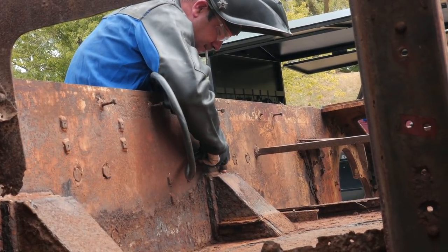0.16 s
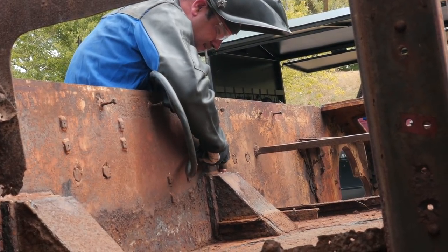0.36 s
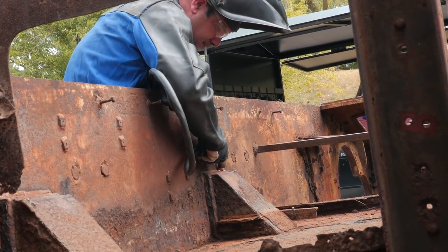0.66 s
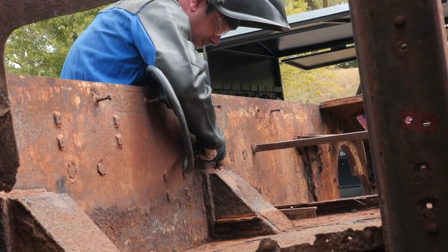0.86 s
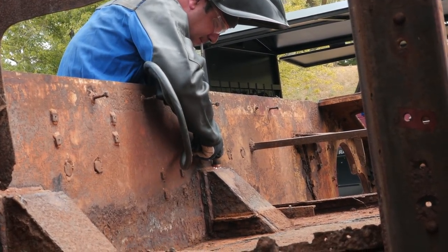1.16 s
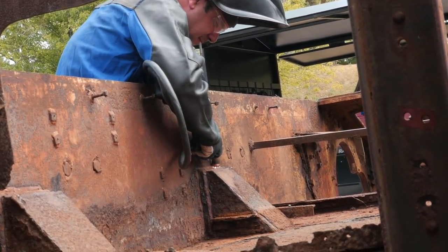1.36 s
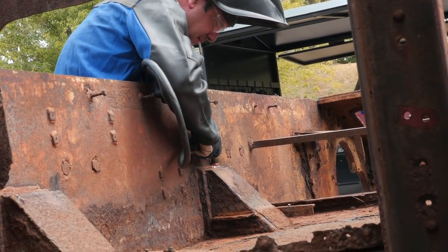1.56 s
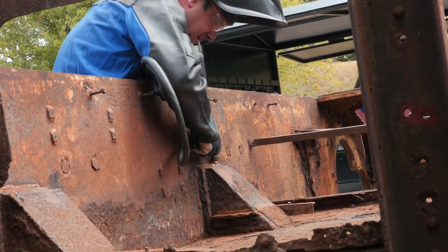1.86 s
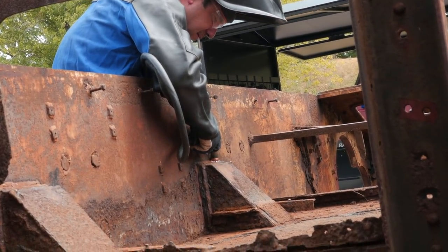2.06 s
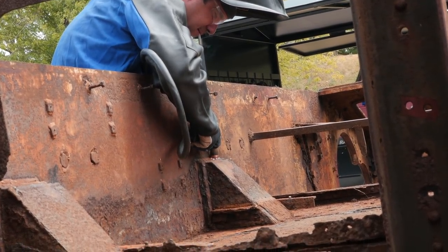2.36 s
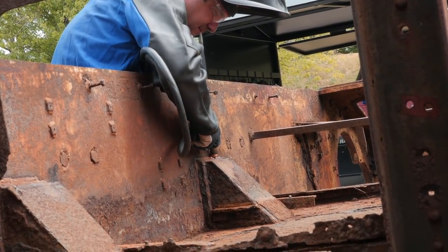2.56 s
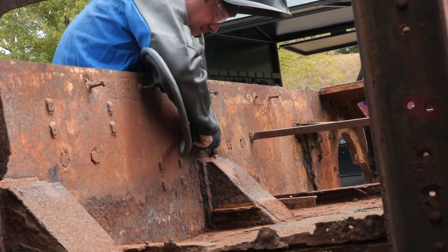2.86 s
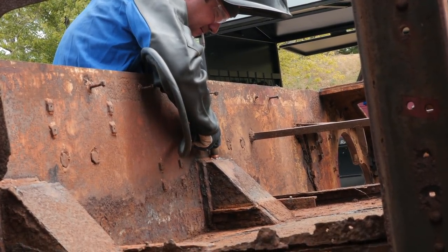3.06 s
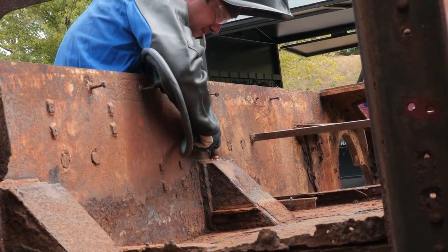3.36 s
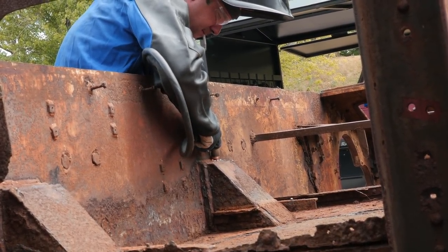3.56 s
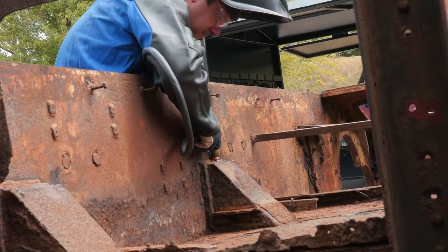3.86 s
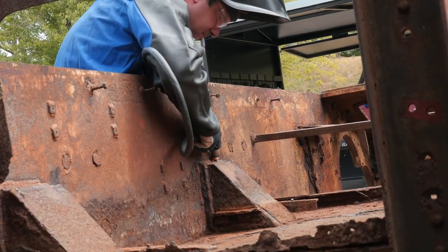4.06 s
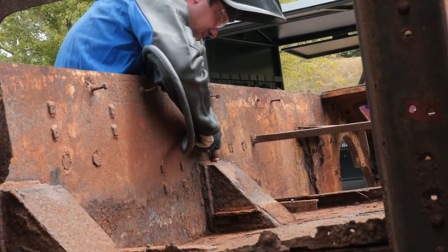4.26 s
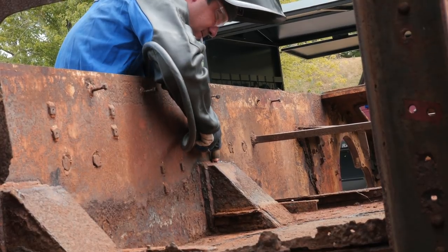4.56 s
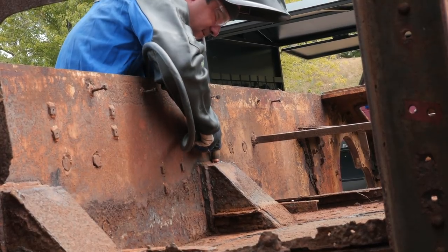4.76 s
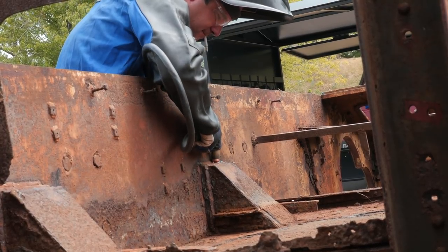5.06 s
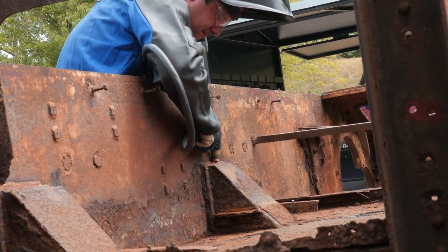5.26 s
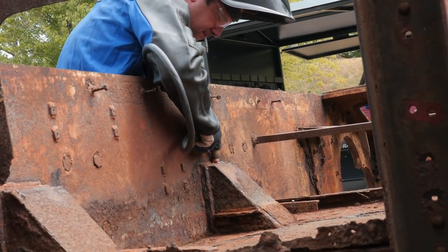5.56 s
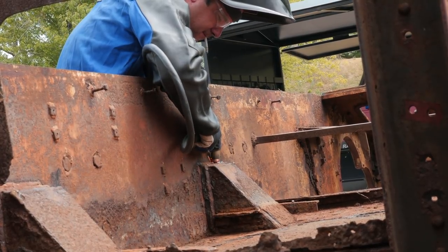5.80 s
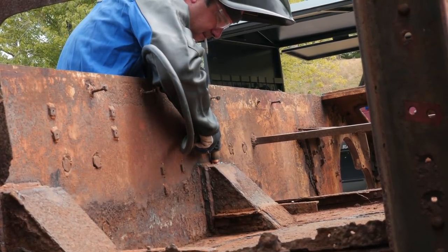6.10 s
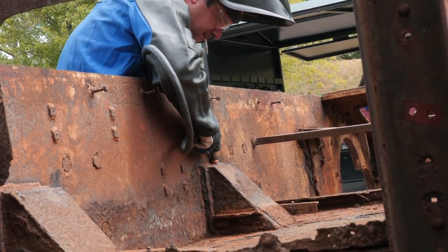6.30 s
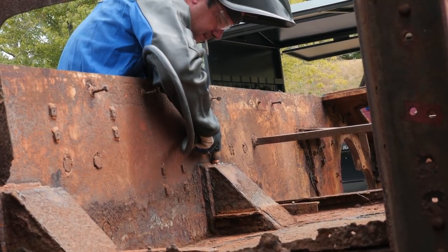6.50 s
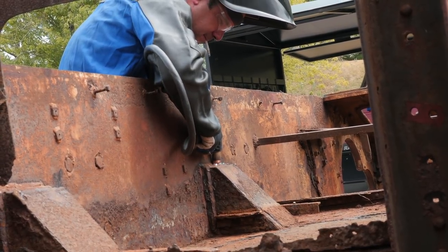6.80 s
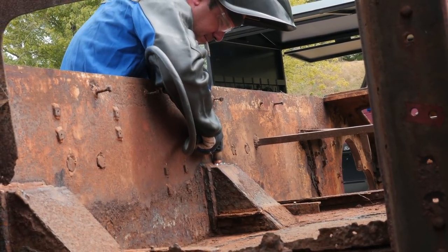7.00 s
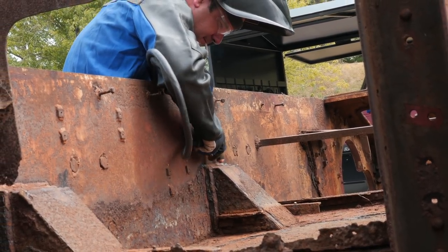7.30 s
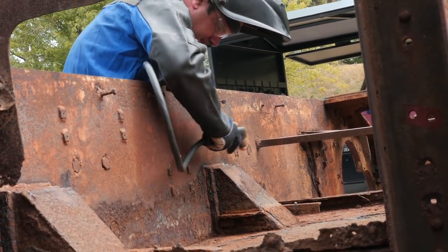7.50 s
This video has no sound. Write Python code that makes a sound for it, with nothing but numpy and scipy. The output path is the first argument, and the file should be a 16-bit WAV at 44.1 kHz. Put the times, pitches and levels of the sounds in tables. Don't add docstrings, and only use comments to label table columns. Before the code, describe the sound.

A plasma torch cuts rusty steel, heard close in stereo, with machines further behind. At 0 seconds air is already hissing softly over a low, buzzing generator hum near 92 hertz and a steady mid-low blower whine near 400 hertz. Around 0.15 the arc strikes and the hiss jumps to a loud, bright, harsh roar. From 0.2 to 0.5 short breathy whistles ring as the metal is pierced, while the engine slows slightly and grows quieter. From 0.5 to 7.2 the jet sizzles continuously, fluttering and faltering briefly, slowly brightening, with metallic resonances and very short echoes from the surrounding plates. The hum and whine waver gently beneath. At about 7.25 the arc goes out suddenly; the hiss falls to a softer rush of air, and the engine picks up speed again until the sound ends at about 7.6.

```python
import sys
import numpy as np
from scipy import signal
from scipy.io import wavfile

SR = 44100
rng = np.random.default_rng(int(sys.argv[2]) if len(sys.argv) > 2 else 0)


def store_wav(level_fs):
    pcm = np.round(np.clip(np.atleast_2d(level_fs), -1, 1) * 32767)
    wavfile.write(sys.argv[1], SR, pcm.T.astype(np.int16))


def magnitude_from_level(level_db):
    exponent = np.asarray(level_db, float) / 20
    return 10 ** exponent


N = 336924

# (time [s], firing rate [Hz], firing tone level [dB])
SPEED = [(0, 92.9, -27.4), (.14, 92.9, -27.2), (.3, 91.9, -29.8), (.45, 91.4, -30.1), (.7, 91.2, -30.4),
         (2, 91.25, -31.1), (3.5, 91.3, -31.1), (4.3, 91.45, -31.1), (5, 91.3, -31.8), (7.22, 91.3, -31.8),
         (7.35, 92.1, -30.8), (7.5, 93.1, -29.9), (7.64, 93.1, -30.1)]
# (time [s], length [s], exhaust change [dB], blower change [dB])
GUSTS = [(.12, 0.16, 4.5, .6), (.31, 0.066, 4.5, 4.5), (.56, 0.09, 3.5, -2.2), (.74, .06, 2, 3),
         (.84, 0.069, .3, -6), (1.4, 0.1, -2, -6), (1.58, 0.11, 2, 3), (1.72, 0.099, -4, -3.2),
         (1.85, 0.087, 5, 3), (2.37, 0.059, -1, 3), (2.87, 0.28, 4, 2), (3.35, .15, -6, 1.5),
         (3.6, 0.23, 2.5, -.6), (3.86, .07, 3, -3), (4.28, 0.072, 0, 2.2), (4.4, .07, -.3, -2.5),
         (4.68, 0.12, 0, 3), (4.88, 0.086, -3, -4), (5, 0.055, .3, 3.5), (5.1, .07, .3, -2.5),
         (5.46, 0.19, 1.5, -4), (5.58, .06, .3, 4), (5.76, .12, -2.2, -1.8), (6.44, .07, 1, -2.5),
         (6.8, .15, 3.5, -1.5), (7.03, 0.15, 6, -2.2), (7.14, 0.07, -9, 1.5), (7.4, 0.091, 1.5, .6)]


def jet(offset_db, flutter_db, patchy_db):
    # (frequency [Hz], level [dB per Hz])
    jet_colour = [(760, -42), (1300, -14.5), (1540, -12), (2330, -4.5), (2560, -8), (3530, -7.5),
                  (3790, -8.5), (4210, -7), (5020, -10.5), (5870, -7), (7940, -4), (9980, -1.5),
                  (12900, 2.5), (14400, -5.5), (15600, -5.5)]
    layer_hz = [2500, 6000, 10800, 14200]
    # (frequency [Hz], width [Hz], level [dB])
    trough_rings = [(2286, 44, -27), (2727, 30, -6), (3590, 240, -15), (4400, 71, -9), (4620, 47, -1),
                    (5180, 470, -26), (5070, 180, -7), (5780, 340, 5), (6830, 130, -10), (7360, 50, -22),
                    (9830, 350, 19.5), (10400, 39, -17), (11000, 99, -13), (13400, 60, -12)]
    # (frequency [Hz], width [Hz], share lost [0 to 1])
    trough_dips = [(1540, 110, 0.27), (3750, 200, 0.53), (5116, 200, 0.69), (5625, 91, 0.61),
                   (9140, 130, 0.17)]
    # (time [s], lift [times])
    kerf_ring = [
        (0, 0.084),
        (2.5, 0.092),
        (4, 0.25),
        (5.5, 0.4),
        (6.8, 0),
        (7.15, 0.63),
        (7.64, 0.65),
    ]
    # (frequency [Hz], width [Hz], lift [times])
    shallow_rings = [(4200, 170, 0.34), (13000, 350, 0.54)]
    arc_db = -27.5
    rings_wander_db = 2.5
    shallow_s = 7.2

    swings = arc_swings()
    flutter = flutter_db * (drift(34.0) + 0.6 * drift(23.0))

    def band_db(hz):
        place = np.interp(np.log(hz), np.log(layer_hz), np.arange(4))
        shares = np.clip(1 - abs(place - np.arange(4)), 0, 1)
        steady_db = at_hz(jet_colour, hz) + arc_db
        return steady_db + shares @ swings + flutter + patchy_db * drift(10.5)

    hiss = banded_noise(np.geomspace(1250, 16500, 21), band_db)
    top_db = max(db for hz, width_hz, db in trough_rings)
    for hz, width_hz, ring_db in trough_rings:
        lift = 0.79 * magnitude_from_level(0.14 * (ring_db - top_db) + rings_wander_db * drift(1.2))
        hiss = hiss + lift * resonance(hiss, hz, 1.43 * width_hz)
    for hz, width_hz, share in trough_dips:
        hiss = hiss - share * resonance(hiss, hz, width_hz)
    hiss = hiss + at_times(kerf_ring)[0] * resonance(hiss, 11770, 780)
    for hz, width_hz, lift in shallow_rings:
        hiss = hiss + lift * bump(0, shallow_s) * resonance(hiss, hz, width_hz)
    return magnitude_from_level(offset_db) * trough_echoes(hiss, echo_db=-28.0, t60=.11, rust_hz=11300)


def arc_swings():
    valve_db = [-12.5, -14, -15, -19]
    preflow_db = [-4.5, -5.5, -2, -10]
    deepens_db_per_s = [0.17, 0.042, 0.25, 0.47]
    afterflow_db = [-7, -7.5, -6, -10.5]
    roar_share = [1.67, 0.55, 0.03, .3]
    hiss_share = [.05, .3, .9, 1.2]
    # (time [s], length [s], roar change [dB], hiss change [dB])
    falters = [(.22, 0.088, 1, -0.3), (0.356, 0.079, 0.7, -1), (0.497, 0.13, -1.5, -0.5),
               (0.922, 0.28, -0.3, 1.2), (1.102, .1, -0.7, -2.2), (1.38, .08, -1, -.6), (1.48, .08, 2.2, 0),
               (1.677, 0.44, -0.7, -0.3), (2.1, 0.56, 1, 0), (2.61, 0.09, -2.5, -1.5), (2.9, 0.47, 1, 0.3),
               (3.555, 0.13, 1.5, 0.5), (3.84, 0.086, -1.5, -2.5), (4.364, 0.069, -1, -1.5),
               (4.798, 0.28, -1.5, 0.7), (4.918, .12, 0.7, 1.2), (5.168, 0.11, 1.5, -1),
               (5.483, 0.12, -0.8, -1.8), (5.644, 0.078, 0.5, 0), (6.1, 0.17, 0.9, 0.7), (6.25, 0.09, 0, 0),
               (6.47, .2, 1.5, 1.5), (6.82, 0.069, -2.5, 0.2), (6.98, 0.14, -2, -0.2), (7.2, 0.083, 0, 0),
               (7.3, .04, 1, 1.5), (7.55, .1, -1.5, 2.5)]
    strike_s, strike_rise_s = .135, .05
    out_s, out_fall_s = 7.25, .032

    t = np.arange(N) / SR
    moments = [0, strike_s, strike_s + strike_rise_s, out_s, out_s + out_fall_s]
    roar_db, hiss_db = swells(falters)
    layers = []
    for k in range(4):
        flow_db = np.interp(t, moments, [valve_db[k], preflow_db[k], 0, 0, afterflow_db[k]])
        falter_db = roar_share[k] * roar_db + hiss_share[k] * hiss_db
        layers.append(flow_db + deepens_db_per_s[k] * t + falter_db)
    return np.array(layers)


def trough_echoes(x, echo_db, t60, rust_hz):
    age = np.arange(1, 3000) / SR
    travel = np.linspace(0, 3, N)
    out = x.copy()
    rust = signal.butter(2, rust_hz, fs=SR, output="sos")
    for place in range(4):
        dying = magnitude_from_level(echo_db - 60 * age / t60) * (age > .0004)
        bounces = signal.sosfilt(rust, rng.standard_normal((2, len(age))) * dying)
        nearness = np.cos(np.clip(travel - place, -1, 1) * np.pi / 2)
        out += signal.oaconvolve(x * nearness, bounces, axes=1)[:, :N]
    return out


def pierce():
    # (time [s], length [s], pitch [Hz], level [dB])
    pierce_rings = [
        (.197, .09, 1830, -39),
        (.195, .085, 2060, -41),
        (.2, .06, 1720, -47),
        (.25, .045, 2360, -44),
        (.285, .05, 1830, -44),
        (.352, .05, 2080, -40),
        (.4, .12, 2330, -47),
        (.42, .07, 1860, -48),
    ]
    rings = 0
    for s, length_s, hz, ring_db in pierce_rings:
        shape = bump(s, length_s / 2 + .005) ** .5
        whistle = magnitude_from_level(ring_db) * shape * tone(np.full(N, hz))
        rings = rings + whistle * np.array([1 + .3 * drift(90) for ear in (0, 1)])
    left, right = rings
    return np.array([np.roll(left, 5), right])


def generator():
    orders_heard = [3, 4, 5, 6, 7, 8, 9, 11, 12, 15, 18, 19, 24, 28, 29, 30]
    # (level over firing tone [dB], wobble [dB])
    order_tones = [(0, 0.15), (-37, -13), (-18, 1.5), (-7.5, 1), (-47, 9), (-21, 1), (-26.5, -8), (-17, 0),
                   (-15.5, 2), (-49, 2), (-21, 2.9), (-26, 1.5), (-32, -1.5), (-16, -0.2), (-45, -8),
                   (-26.5, 3)]
    # (frequency [Hz], level [dB per Hz])
    rumble_colour = [(25, -30), (60, -12), (115, -7), (150, -5.5), (195, -19.5), (250, 0), (320, -12),
                     (390, -5.5), (470, -11), (760, -11.5), (900, -12), (1200, -13), (1500, -23.5),
                     (3000, -41.5)]
    # (frequency [Hz], width [Hz], lift [times])
    casing = [(150.6, 10.7, 1.8), (248, 19, 1.06), (264.5, 22, 1.42), (433, 20, -0.79), (484, 48, -0.31),
              (540, 21, -0.29), (548, 19, 0.13), (633, 33, 0.2), (812, 19, 0.3), (892, 45, 0.7),
              (1070, 44, 0.82), (1178, 30, 1.43)]

    firing_hz, firing_db = at_times(SPEED)
    hum = 0
    for order, (order_db, wobble_db) in zip(orders_heard, order_tones):
        tone_db = firing_db + order_db + wobble_db * drift(4.4)
        hum = hum + magnitude_from_level(tone_db) * tone(firing_hz * order / 3)
    surge_db = swells(GUSTS)[0] - 1.05

    def band_db(hz):
        return at_hz(rumble_colour, hz) + .8 * drift(6.0) + surge_db * (200 < hz < 340)

    rumble = banded_noise(np.geomspace(22, 3200, 19), band_db)
    rumble = rumble + sum(lift * resonance(rumble, hz, width_hz) for hz, width_hz, lift in casing)
    late = np.roll(hum, 6)
    return np.array([hum, late]) + magnitude_from_level(firing_db - 5.0) * rms_one(rumble)


def blower():
    firing_hz, firing_db = at_times(SPEED)
    blade_hz = 4.277 * firing_hz
    waver_db = 0.5 * drift(5)
    blade_db = firing_db - 4.5 + swells(GUSTS)[1] + waver_db
    blades = tone(blade_hz) * (1 + 0.18 * drift(26.0)) + magnitude_from_level(-26.0) * tone(2 * blade_hz)
    pair = np.array([blades, np.roll(blades, 4)])
    return magnitude_from_level(blade_db) * pair * magnitude_from_level([[.2], [-.2]])


def banded_noise(edges, band_db):
    # (frequency [Hz], likeness [-1 to 1])
    likeness = [(25, .6), (45, .75), (70, 0.93), (400, 0.96), (700, 0.55), (1200, 0.36), (1500, 0.11),
                (3000, 0.26), (6500, 0.068), (9000, 0.29), (10000, 0.88), (15000, 0.53)]
    # (frequency [Hz], left minus right [dB])
    leaning = [(25, 0), (200, -.4), (400, .3), (1290, 0), (2380, -1.2), (4400, -2.4), (6300, -1.4),
               (8120, .3), (15000, .3)]
    out = 0
    white = rng.standard_normal((2, 2, N))
    for k, (low, high) in enumerate(zip(edges, edges[1:])):
        band = signal.butter(2, [low, high], "band", fs=SR, output="sos")
        mid, side = signal.sosfilt(band, white[k % 2])
        hz = np.sqrt(low * high)
        alike = at_hz(likeness, hz)
        pair = np.sqrt(1 + alike) * mid + np.sqrt(1 - alike) * side * [[1], [-1]]
        lean_db = at_hz(leaning, hz) * np.array([[.5], [-.5]])
        out = out + magnitude_from_level(band_db(hz) + lean_db) * pair
    return out


def resonance(x, hz, width_hz):
    r = np.exp(-np.pi * width_hz / SR)
    feedback = [1, -2 * r * np.cos(2 * np.pi * hz / SR), r * r]
    return signal.lfilter(np.array([1, 0, -1]) * (1 - r * r) / 2, feedback, x)


def tone(hz):
    return np.sqrt(2) * np.sin(2 * np.pi * (np.cumsum(hz) / SR + rng.random()))


def drift(rate):
    r = np.exp(-80 * np.pi * rate / SR)
    chance = rng.standard_normal(N // 40 + 2002)
    slow = signal.lfilter([1], [1, -2 * r, r * r], chance)[2000:]
    return np.interp(np.arange(N) / 40, np.arange(len(slow)), rms_one(slow))


def bump(centre_s, length_s):
    return np.cos(np.pi / 2 * np.clip((np.arange(N) / SR - centre_s) / length_s, -1, 1)) ** 2


def swells(rows):
    shapes = np.array([bump(s, length_s) for s, length_s, *_ in rows])
    return np.array(rows)[:, 2:].T @ shapes


def at_times(rows):
    s, *columns = np.transpose(rows)
    return [np.interp(np.arange(N) / SR, s, c) for c in columns]


def at_hz(points, hz):
    point_hz, values = np.transpose(points)
    return np.interp(np.log(hz), np.log(point_hz), values)


def rms_one(x):
    return x / np.sqrt(np.mean(x ** 2) + 1e-20)


def scene():
    torch = jet(offset_db=2.5, flutter_db=0.32, patchy_db=0.7) + pierce()
    return torch + generator() + blower()


def low_pass(x):
    return signal.sosfilt(signal.butter(12, 15780, fs=SR, output="sos"), x)


def record(dry):
    gapped = dry - .97 * resonance(dry, 7850, 125)
    top_cut = signal.ellip(11, .5, 90, 15460, fs=SR, output="sos")
    finished = signal.sosfilt(top_cut, gapped)
    return low_pass(finished)


dry = scene()
out = record(dry)
store_wav(out)
```